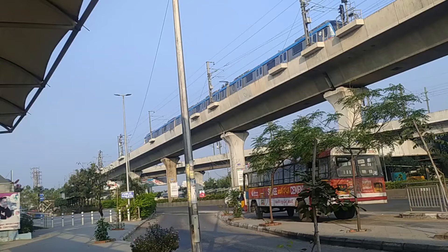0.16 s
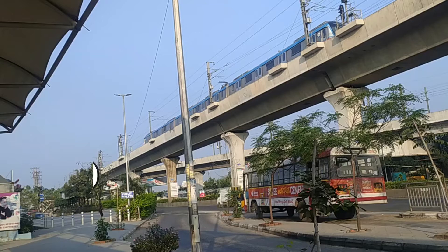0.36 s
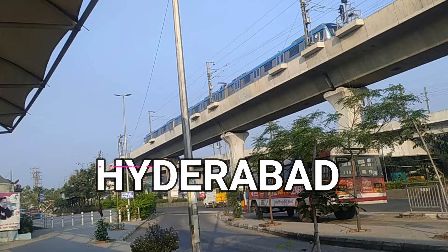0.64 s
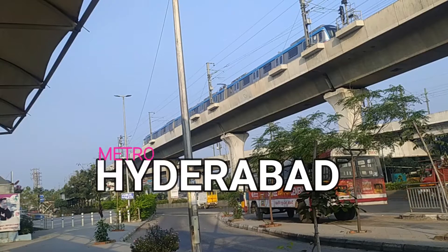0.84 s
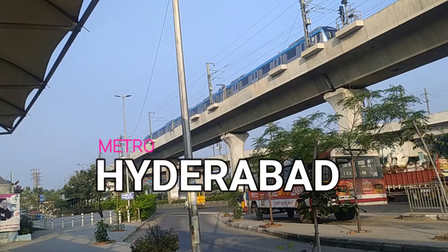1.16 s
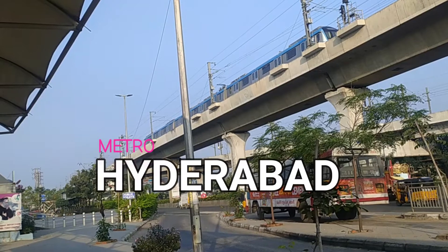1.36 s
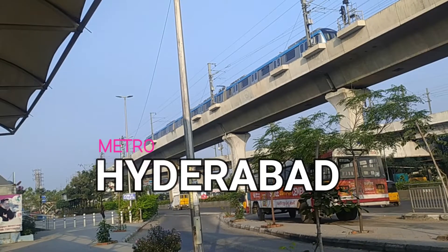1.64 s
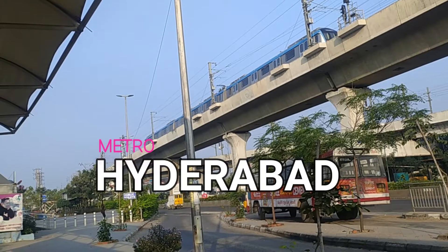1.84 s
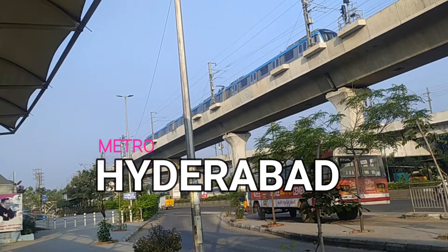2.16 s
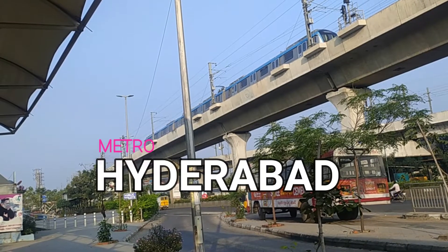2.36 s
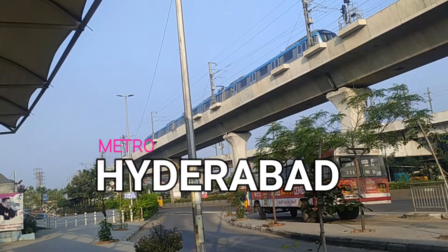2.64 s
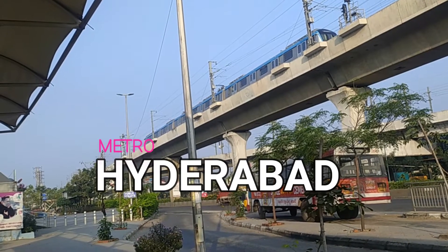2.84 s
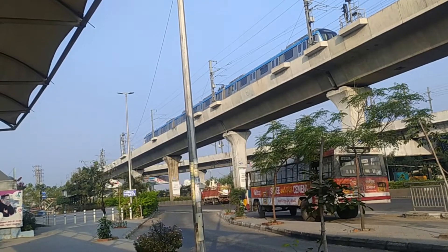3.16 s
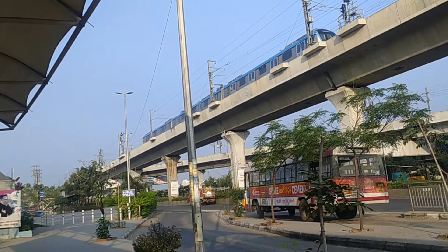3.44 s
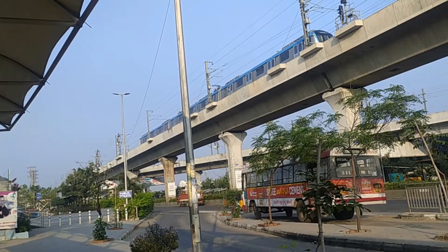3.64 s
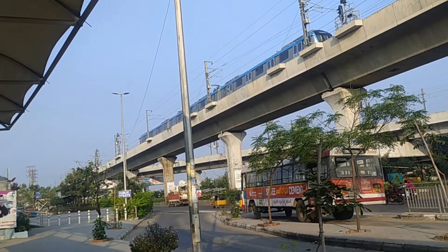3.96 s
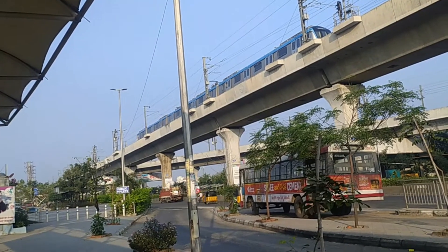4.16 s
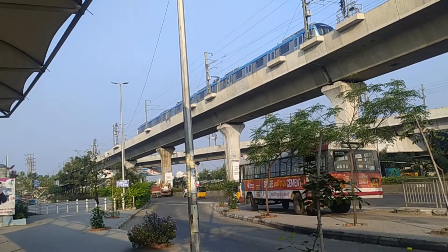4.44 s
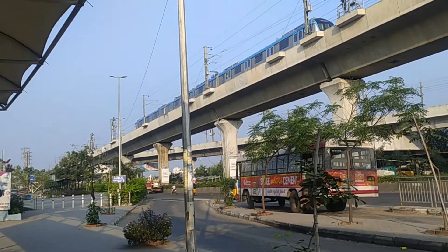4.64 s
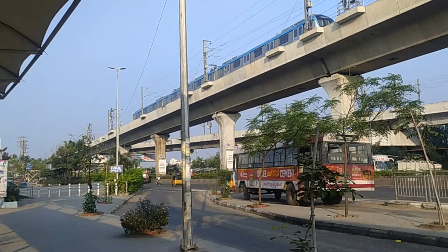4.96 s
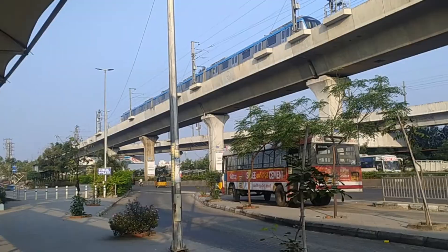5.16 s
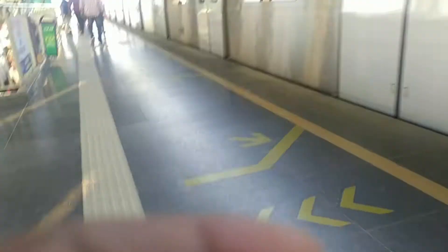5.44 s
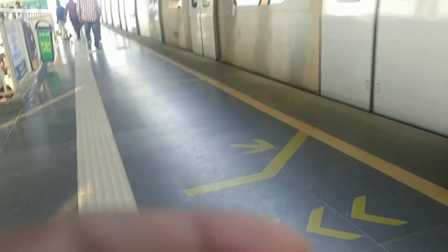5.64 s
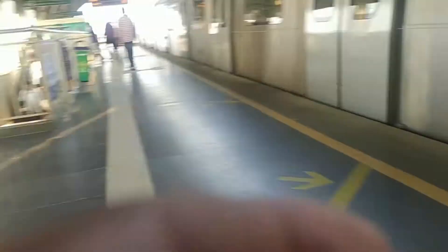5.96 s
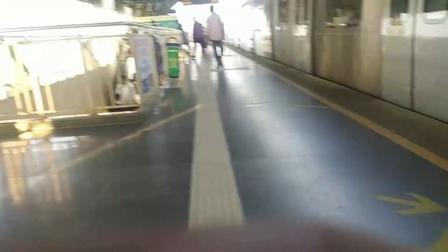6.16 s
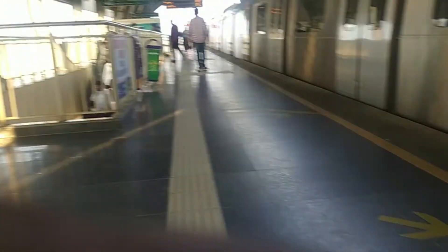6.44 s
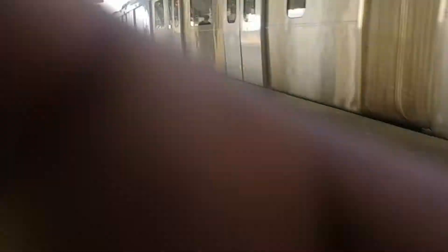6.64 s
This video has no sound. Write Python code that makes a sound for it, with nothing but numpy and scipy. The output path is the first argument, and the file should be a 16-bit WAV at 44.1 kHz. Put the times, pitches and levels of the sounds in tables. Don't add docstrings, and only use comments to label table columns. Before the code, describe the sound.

Silence until about 0.46 s, when a busy street starts abruptly: continuous low rumble, broad tyre roar and soft hiss, in wide stereo from a phone at the kerb. One diesel leaves by 1.1 s while others idle with wavering drones. Thin, very high brake squeaks flick by between 0.6 and 3.2 s over a faint air leak, first at left. A bus pulls from 2.3 s, drops off near 3.25 s for a gear change, then labours from 3.8 s, growing louder and rightward until 5.43 s. Faint distant horns come around 2.9-3.4 and 3.8-4.5 s. Silence lasts until 5.77 s. Then a hard cut to a platform: an electric train rolls by with rushing air, pulsing hissy mid-high whine and fluttering motor tones, the lower whine swelling around 6.4 s. A sharp double finger tick at 6.42 s, brief skin brushing and a lighter tick at 6.49 s follow; the train continues to the end.

```python
import sys
import numpy as np
from scipy import signal
from scipy.fft import rfft, irfft, next_fast_len
from scipy.io import wavfile
from scipy.ndimage import uniform_filter1d, map_coordinates

SR = 44100
rng = np.random.default_rng(int(sys.argv[2]) if len(sys.argv) > 2 else 0)


def master(y):
    cut = np.clip(np.atleast_2d(y).T, -1, 1)
    pcm = np.round(cut * 32767)
    wavfile.write(sys.argv[1], SR, pcm.astype(np.int16))


def rack_gain(trim_db):
    fader = np.asarray(trim_db, float)
    return 10 ** (fader / 20)


N = 299439
TIME = np.arange(N) / SR

# on_s, off_s
SHOTS = [
    (.4586, 5.4292),
    (5.7724, 7),
]
# freq_hz, likeness (-1 to 1)
ALIKE = [(60, 0.97), (170, 1), (500, 0.72), (860, 0.29), (1200, 0.018), (1600, -0.28), (1950, -0.44),
         (2250, 0.41), (2600, 0.11), (3300, .04), (6000, -0.0042)]
# freq_hz, left_minus_right_db
KERB_SIDE = [(60, 0.5), (110, 0), (200, -0.5), (380, 1.5), (690, -1), (1280, 2), (2360, 4), (4360, 3.5),
             (8040, 2.5), (14800, 1)]
PLATFORM_SIDE = [(60, -2.5), (110, 6), (200, 0.5), (380, 1), (690, -2), (1280, 3), (2360, 0.5), (4360, -1),
                 (8040, -2.5), (14800, 1.5)]

# freq_hz, density_db
RUMBLE_COLOUR = [(12, -46.5), (20, -12.5), (75, -5.5), (138, -6), (207, 0), (274, -5), (333, -4),
                 (416, -12), (700, -27.5), (910, -35), (1540, -120)]
TYRE_COLOUR = [(240, -41.5), (400, -0.5), (594, -1), (1320, -1), (1540, -5.5), (2420, -5.5), (3550, -11.5),
               (3830, -10), (5500, -22.5), (7150, -21.5), (12100, -120)]
HISS_COLOUR = [(2650, -23.5), (4500, -3.5), (5840, -2.5), (7480, -1.5), (8600, 1.5), (9300, 2),
               (10300, -5.5), (11200, -14.5), (12500, -17), (14300, -35.5)]
# centre_hz, width_hz, level_db
RASP = [(2466, 1450, 0)]
# time_s, level_db
TRAFFIC = [(.47, 0.5), (1.05, .5), (1.6, -0.5), (2.2, -1.5), (3.1, -2), (4.6, -0.5), (5.14, -2),
           (5.42, -0.5)]
# time_s, level_db
BUS_NEAR = [(.47, -43.5), (1.3, -44), (1.6, -37), (3.3, -40.5), (4.6, -37), (5.3, -37), (5.43, -32.5)]
# time_s, left_minus_right_db
CROSSING = [(0, 1.85), (4.2, 0.26), (4.7, -1.3), (5.43, -1.8)]

# time_s, pitch_hz
IDLING_HZ = [(.47, 103.5), (1.1, 105.5), (1.9, 105), (2.3, 101.5), (3.1, 101.5), (4.4, 99.5)]
WAITING_HZ = [(.55, 326), (.85, 325), (1.3, 320), (1.55, 329.2), (2.2, 320), (2.7, 321)]
LEAVING_HZ = [(.47, 70.4), (.7, 72.44), (.85, 73.7)]
PULLING_HZ = [(2.2, 56.1), (2.6, 60.98), (2.95, 65.56), (3.25, 64.8), (3.7, 52.1), (4.1, 54.7),
              (4.5, 57.75), (5.06, 60.8), (5.43, 61.87)]
# time_s, level_db
IDLING = [(.9, -38), (1.12, -31.5), (1.4, -33.5), (1.8, -34), (2.2, -37), (2.55, -32.5), (2.9, -36),
          (3.05, -32), (3.6, -41), (4.0, -36.5), (4.25, -30.5), (4.4, -43.5)]
WAITING = [(.55, -47), (.72, -35), (1.35, -36), (2.05, -43), (2.21, -31.5), (2.4, -43), (2.7, -42.5)]
LEAVING = [(.47, -33.5), (.78, -34.5), (.86, -44), (1.1, -51.5)]
# time_s, load_db
PULLING = [
    [(2.3, -44), (2.6, -42.5), (3.1, -35.5), (3.25, -54)],
    [(3.8, -41.5), (4.5, -35.5), (4.9, -32), (5.15, -30), (5.43, -29.5)],
]
# multiple (ratio), level_db
LEAVING_ORDERS = [(2, -7), (3, -18), (4, 1.5), (6, -8.5), (7, -18.5)]
PULLING_ORDERS = [(1, -10.5), (4, -1.5)]
LABOURING_ORDERS = [(3, -4), (5, -7.5), (6, -8), (7, -13), (8, -13.5)]
# time_s, pitch_hz; time_s, level_db
WHISTLE_HZ = [(4.4, 2338), (5.4, 2325)]
WHISTLE = [(4.35, -50), (4.8, -44), (5.4, -47)]

# time_s, level_db
LEAK = [(.47, -62), (.69, -61.5), (.95, -57), (1.45, -60.5), (1.56, -53), (2.79, -59), (3.31, -57.5),
        (4.55, -63), (4.68, -62), (4.9, -59), (5.2, -61), (5.38, -53.5), (5.43, -51)]
# freq_hz, density_db
LEAK_COLOUR = [(9000, -25.5), (10800, 1.5), (12500, -5), (14300, -16.5)]
# time_s, left_minus_right_db
LEAK_PAN = [(.47, 23), (1.4, 13), (3.5, 12.5), (5.42, -2)]
# start_s, length_s, pitch_hz, level_db
SQUEAKS = [(.62, .1, 8980, -48), (1.1, .06, 8840, -44.5), (1.28, .08, 8070, -46), (1.47, .13, 8140, -42),
           (1.86, .07, 8880, -50), (2.0, .1, 8300, -46), (2.41, .1, 8830, -43.5), (2.608, .07, 8400, -50),
           (2.69, .12, 8030, -45.5), (2.79, .08, 8800, -46.5), (2.934, .08, 8300, -47),
           (3.033, .16, 7950, -45.5), (4.18, .05, 8110, -57)]

HORN_HZ = (3484, 3848, 3133)
# start_s, length_s, level_db
HORN = [
    [(3.78, .04, -42), (3.93, .1, -45.5), (4.025, 0.067, -37), (4.185, 0.07, -35.5), (4.27, .07, -43.5),
     (4.365, 0.057, -41), (4.42, .045, -39), (4.485, .045, -42), (4.565, .03, -45)],
    [(3.8, 0.079, -47), (3.875, .13, -45.5), (4.0, .08, -48), (4.2, .12, -46.5), (4.36, .08, -51)],
    [(3.8, 0.071, -49), (3.95, .04, -42.5), (4.01, .04, -42), (4.28, .17, -45)],
]
# time_s, level_db
FAR_HORN = [(2.9, -55), (3.2, -52), (3.4, -54)]
# multiple (ratio), level_db
FAR_HORN_ORDERS = [(0.898, 4), (1, -7.5), (1.2, -5.5)]

# time_s, level_db
TRAIN = [(5.78, 2), (5.8, -0.5), (6.1, -0.5), (6.4, 0), (6.79, 0.5)]
# time_s, left_minus_right_db
TRAIN_PAN = [(5.78, -1), (6.79, 1.5)]
# freq_hz, density_db
ROLLING_COLOUR = [(20, -6), (45, 4), (125, -3), (200, 3), (500, 3), (900, 3.5), (1100, -6), (2100, -6),
                  (3000, -8.5), (4500, -32)]
AIR_COLOUR = [(2060, -29.5), (3500, -4.5), (4100, -2), (5640, -7), (8420, -6), (9700, -5.5), (10500, -10),
              (11500, -18), (13000, -30.5), (14300, -38.5)]
# time_s, level_db
AIR_FADE = [(5.78, 1.5), (6.1, -1), (6.79, -0.5)]
# centre_hz, width_hz, level_db
INVERTER = [
    (1645, 143, 0),
    (2482, 290, 0),
]
# time_s, level_db
EFFORT = [(5.78, -3), (6.1, -2.5), (6.3, 1), (6.4, 4.5), (6.6, 3.5), (6.79, -0.5)]
# time_s, pitch_hz
MOTOR_HZ = [(5.78, 744), (6.05, 742), (6.2, 755), (6.4, 762), (6.55, 746), (6.79, 745)]
# start_s, length_s, multiple of slot tone (ratio), level_db
MOTOR = [(5.775, 0.063, 1, -28.5), (5.93, .12, 1, -31), (6.14, 0.069, 1, -37), (6.24, 0.078, 1, -32.5),
         (6.33, 0.089, 1, -31), (6.58, .16, 1, -35.5), (6.05, 0.2, 1 / 4, -37.5), (6.32, 0.083, 1 / 4, -37),
         (5.93, 0.31, 1 / 2, -37), (6.52, 0.11, 3 / 4, -36), (6.68, 0.095, 3 / 4, -32)]
# multiple (ratio), level_db
HUM = [(1, -42), (1 / 4, -43.5), (1 / 2, -47), (3 / 4, -50.5)]
# pitch_hz of each, then level_db of each
MAINS_HZ = (996, 1098, 1195, 1793)
MAINS = (-36.5, -43.5, -48, -58)
# time_s, level_db
MAINS_FADE = [(5.78, -5.5), (5.95, -0.5), (6.79, -4.5)]

# start_s, peak_db
TICKS = [
    (6.4206, -10),
    (6.4244, -17),
    (6.489, -28),
]
# centre_hz, width_hz, level_db
CASE = [(4200, 500, -7), (5800, 600, -6), (8000, 1200, -3), (10000, 900, 1), (12200, 700, -7),
        (13500, 700, -18)]
# time_s, level_db
SLIDE = [(6.425, -77), (6.432, -53), (6.47, -51), (6.5, -61), (6.52, -90)]
# freq_hz, level_db against the mean density
MASKED = [(3000, -21), (3600, -13.5), (5000, -10.5), (6800, -12.5), (8000, -21), (9500, -19), (10300, -11),
          (11500, -15), (12500, -20), (13600, -22)]


def unit(x):
    return x / np.sqrt(np.mean(np.abs(x) ** 2) + 1e-20)


def along(points, hz):
    f, v = np.transpose(points)
    return np.interp(np.log(hz + 1), np.log(f + 1), v)


def curve(rows):
    s, value = np.transpose(rows)
    return np.interp(TIME, s, value)


def panned(left_minus_right_db):
    return np.outer([.5, -.5], left_minus_right_db)


def wobble(rate):
    knots = rng.standard_normal(int(N * rate / SR) + 4)
    return map_coordinates(knots, [TIME * rate], order=1)


def filtered(x, response):
    m = next_fast_len(N + 8192)
    spectrum = rfft(x, m) * response(np.fft.rfftfreq(m, 1 / SR))
    return irfft(spectrum, m)[..., :N]


def modes(table):
    def response(f):
        total = 0
        for k, (centre, width, db) in enumerate(table):
            damping = 1j * f * width
            total = total + (-1) ** k * rack_gain(db) * damping / (centre * centre - f * f + damping)
        return total
    return response


def colour(spectrum):
    return lambda hz: rack_gain(along(spectrum, hz))


def rush(gain, patchy_db):
    z = signal.stft(rng.standard_normal((2, N)), nperseg=512)[2]
    field = uniform_filter1d(rng.standard_normal(z.shape[1:]), size=6, axis=0)
    field = uniform_filter1d(field, size=14, axis=1)
    pair = signal.istft(z * rack_gain(patchy_db * unit(field)), nperseg=512)[1][:, :N]

    def mid_side_gain(hz):
        angle = np.arccos(np.clip(along(ALIKE, hz), -1, 1)) / 2
        return gain(hz) * [np.ones_like(hz), np.tan(angle)]

    mid, side = filtered(pair, mid_side_gain)
    return np.array([mid + side, mid - side]) / np.std(mid)


def tones(pitch, level, orders, rough, rate):
    pitch, level = np.asarray(pitch), np.asarray(level)
    a, b = round(level[0, 0] * SR), min(round(level[-1, 0] * SR), N)
    t, out = TIME[a:b], np.zeros((2, N))
    hz = np.interp(t, pitch[:, 0], pitch[:, 1])
    fade = np.minimum(1, np.minimum(t - t[0], t[-1] - t) / 0.0076)
    gain = rack_gain(np.interp(t, level[:, 0], level[:, 1])) * fade
    phase = 2 * np.pi * np.cumsum(hz) / SR
    knots = np.arange(int((b - a) * rate / SR) + 2) / rate + t[0]
    for k, db in orders:
        alike = np.clip(along(ALIKE, k * hz.mean()), -.9, 1)
        z = rng.standard_normal((4, len(knots)))
        common = np.interp(t, knots, z[0]) + 1j * np.interp(t, knots, z[1])
        own = np.interp(t, knots, z[2]) + 1j * np.interp(t, knots, z[3])
        mid = unit(1 + rough * common)
        side = np.sqrt((1 - alike) / (1 + alike)) * unit(1j + rough * own)
        ports = np.array([mid + side, mid - side])
        out[:, a:b] += rack_gain(db) * np.sqrt(2) * gain * np.real(np.exp(1j * k * phase) * ports)
    return out


def swell(s, length, db):
    edge, edge_db = .27, 8
    return [(s, db - edge_db), (s + edge * length, db), (s + (1 - edge) * length, db), (s + length, db - edge_db)]


def roar():
    rumble_db, tyres_db, hiss_db = -30.5, -32, -38
    busy_db, leak_db = curve(TRAFFIC), curve(LEAK)
    surge = 0.5 * wobble(6)
    rumble = rack_gain(rumble_db + busy_db + surge + 0.27 * wobble(14)) * rush(colour(RUMBLE_COLOUR), patchy_db=-0.5)
    tyres = rack_gain(tyres_db + .4 * busy_db + surge) * rush(colour(TYRE_COLOUR), patchy_db=0.98)
    rasp_gain = lambda hz: modes(RASP)(hz) ** 2 / (1 + (hz / 4000) ** 4)
    rasp = rack_gain(curve(BUS_NEAR)) * rush(rasp_gain, patchy_db=1.0)
    hiss_db = hiss_db + 0.35 * (leak_db - leak_db.mean())
    hiss = rack_gain(hiss_db + surge + 0.41 * wobble(30)) * rush(colour(HISS_COLOUR), patchy_db=0.9)
    return rumble + tyres + rasp + hiss


def engines():
    idle = tones(IDLING_HZ, IDLING, [(1, -8.5), (2, -1.5)], rough=0.5, rate=16)
    wait = tones(WAITING_HZ, WAITING, [(1, -1.5)], rough=0.9, rate=14)
    leave = tones(LEAVING_HZ, LEAVING, LEAVING_ORDERS, rough=0.54, rate=12)
    whistle = tones(WHISTLE_HZ, WHISTLE, [(1, -2.5)], rough=1.2, rate=50)
    mix = idle + wait + leave + whistle
    full_load_db, labour_grows = -29, 2.9
    for gear in PULLING:
        heavy = [(s, full_load_db + labour_grows * (db - full_load_db)) for s, db in gear]
        mix += tones(PULLING_HZ, gear, PULLING_ORDERS, rough=0.15, rate=5.8)
        mix += tones(PULLING_HZ, heavy, LABOURING_ORDERS, rough=0.22, rate=8.7)
    return mix


def leak():
    level_db = curve(LEAK) + 0.83 * wobble(12) + panned(curve(LEAK_PAN))
    return rack_gain(level_db) * rush(colour(LEAK_COLOUR), patchy_db=3.0)


def brakes():
    mix = np.zeros((2, N))
    for s, length, hz, db in SQUEAKS:
        drift_hz = 30 * rng.standard_normal(3)
        pitch = np.c_[s + length * np.arange(3) / 2, hz + drift_hz]
        mix += tones(pitch, swell(s, length, db), [(1, 0)], rough=.8, rate=90)
    return mix


def horns():
    far = tones([(0, 3900)], FAR_HORN, FAR_HORN_ORDERS, rough=0.43, rate=60)
    note = tones([(0, 345)], [(3.78, -42), (4.5, -44)], [(1, 0)], rough=0.7, rate=13)
    mix = far + note
    for hz, rows in zip(HORN_HZ, HORN):
        for row in rows:
            mix += tones([(0, hz)], swell(*row), [(1, 0)], rough=.15, rate=40)
    return mix


def inverter_band(band):
    gain = lambda hz: modes([band])(hz) ** 2 / (1 + (hz / 3500) ** 4)
    return rack_gain(1.7 * wobble(20)) * rush(gain, patchy_db=0.5)


def train():
    rolling_db, air_db, low_db, high_db = -28.5, -39.5, -33.5, -32
    rolling = rack_gain(rolling_db + curve(TRAIN) + .6 * wobble(12)) * rush(colour(ROLLING_COLOUR), patchy_db=1.0)
    air = rack_gain(air_db + curve(AIR_FADE)) * rush(colour(AIR_COLOUR), patchy_db=1.5)
    low, high = [inverter_band(band) for band in INVERTER]
    bogie_db = 1.5 * np.cos(2 * np.pi * (TIME - 5.3) / 0.284)
    inverter = rack_gain(low_db + curve(EFFORT)) * low + rack_gain(high_db + bogie_db) * high
    hum = tones(MOTOR_HZ, TRAIN, HUM, rough=1.5, rate=30)
    mains = tones([(0, 1)], MAINS_FADE, zip(MAINS_HZ, MAINS), rough=0.8, rate=30)
    mix = rolling + air + inverter + hum + mains
    for s, length, k, db in MOTOR:
        mix += tones(MOTOR_HZ, swell(s, length, db), [(k, 0)], rough=0.5, rate=40)
    return mix * rack_gain(panned(curve(TRAIN_PAN)))


def finger():
    blows, t = np.zeros((2, N)), np.arange(300) / SR
    for s, db in TICKS:
        a = round(s * SR)
        decay = rack_gain(db + 3 - 60 * t / .007)
        blows[:, a:a + len(t)] += decay * rng.standard_normal((2, len(t)))
    brush = rush(modes([(10500, 3500, 0)]), patchy_db=1.0)
    return filtered(blows, modes(CASE)) + rack_gain(curve(SLIDE)) * brush


def shaded(x, side):
    return filtered(x, lambda hz: rack_gain(panned(along(side, hz))))


def scene():
    street = shaded(roar() + engines() + brakes() + horns(), KERB_SIDE) + leak()
    street = street * rack_gain(panned(curve(CROSSING)))
    platform = shaded(train(), PLATFORM_SIDE) + finger()
    on = [np.clip(np.minimum(TIME - a, b - TIME) / .0015, 0, 1) ** 2 for a, b in SHOTS]
    return on[0] * street + on[1] * platform


def low_pass(x):
    return signal.sosfilt(signal.butter(12, 15420, fs=SR, output="sos"), x)


def record(dry):
    hz, t, z = signal.stft(dry, SR, nperseg=2048, window="cosine")
    power = np.abs(z) ** 2
    local = uniform_filter1d(uniform_filter1d(power, size=7, axis=1), size=3, axis=2)
    luck = rng.standard_normal((len(hz) // 5 + 1, z.shape[2]))
    luck = unit(uniform_filter1d(luck, size=3, axis=1))
    margin_db = along(MASKED, hz)[:, None] + 6 * np.repeat(luck, repeats=5, axis=0)[:len(hz)]
    audible = local > power.mean(axis=(0, 1)) * rack_gain(2 * margin_db)
    sharp = np.abs(t - np.array(TICKS)[:, :1]).min(axis=0) < 1024 / SR
    keep = (audible | sharp | (hz < 3000)[:, None]) & (hz < 14260)[:, None]
    kept = signal.istft(z * keep, SR, nperseg=2048, window="cosine")[1][:, :N]
    return low_pass(kept * (dry != 0))


dry = scene()
out = record(dry)
master(out)
```